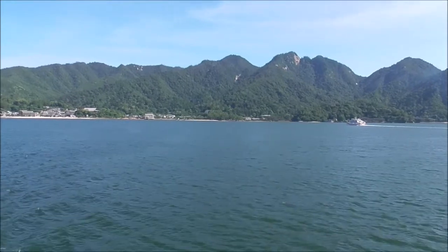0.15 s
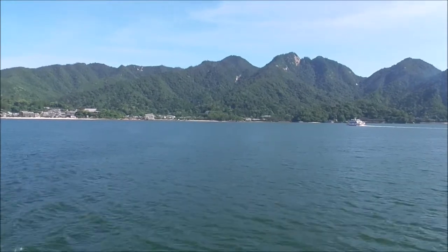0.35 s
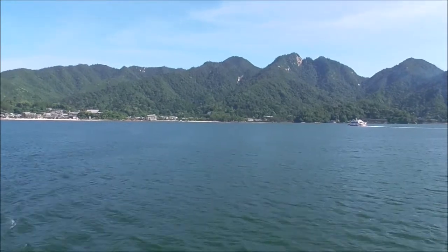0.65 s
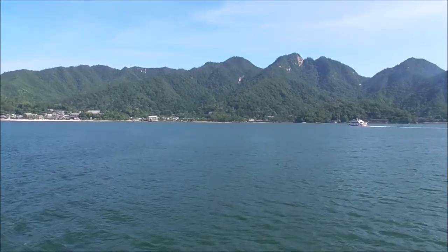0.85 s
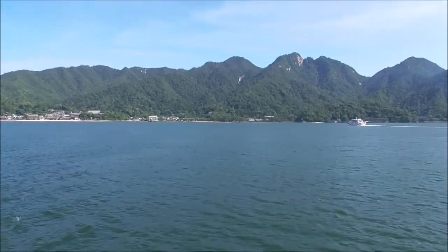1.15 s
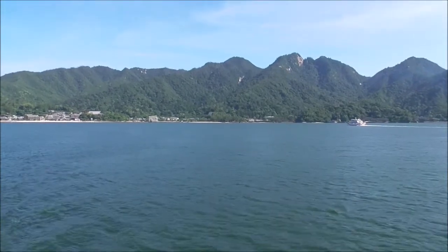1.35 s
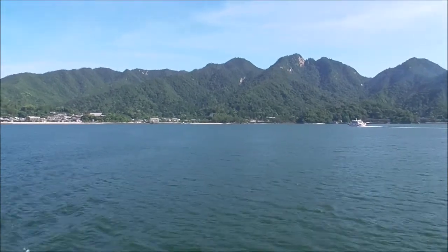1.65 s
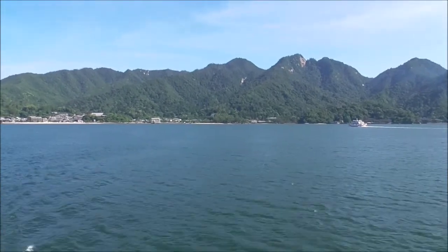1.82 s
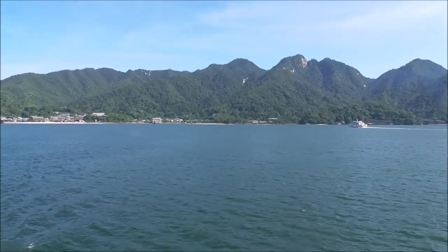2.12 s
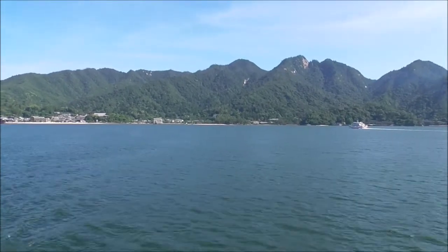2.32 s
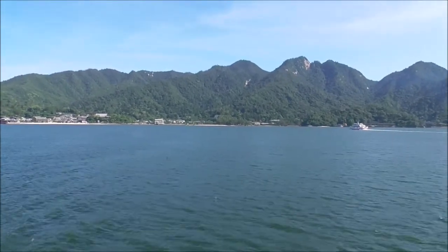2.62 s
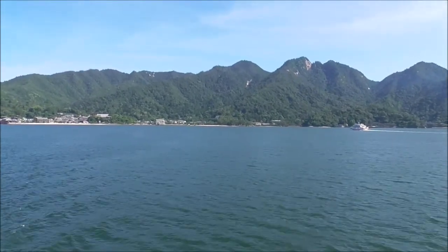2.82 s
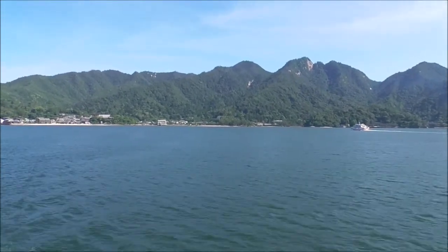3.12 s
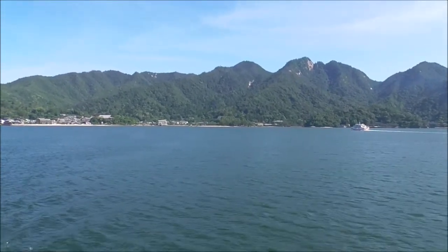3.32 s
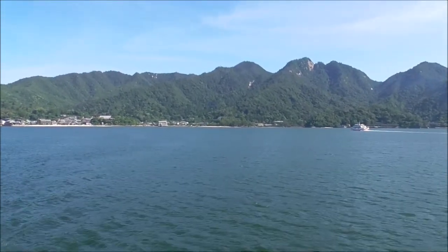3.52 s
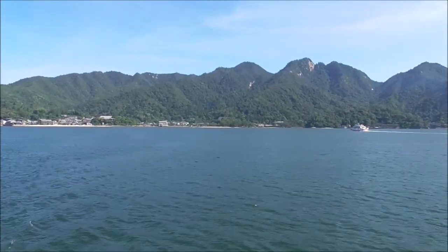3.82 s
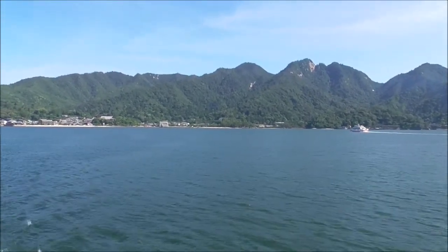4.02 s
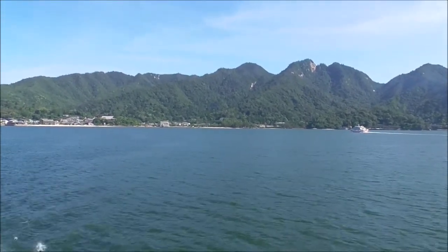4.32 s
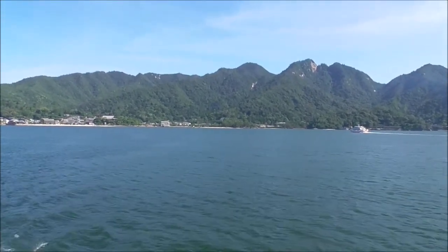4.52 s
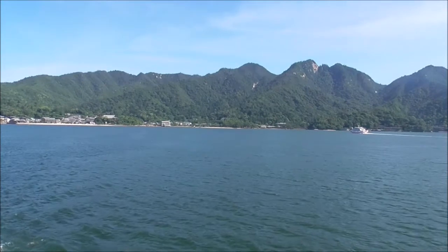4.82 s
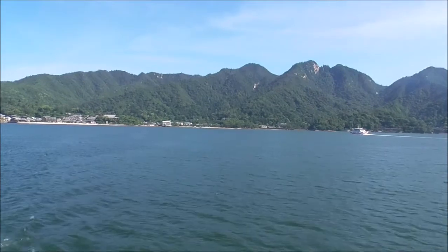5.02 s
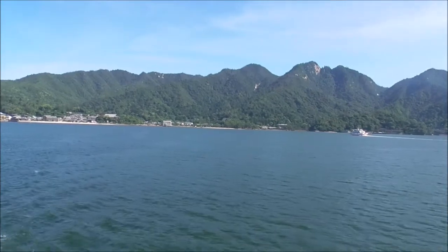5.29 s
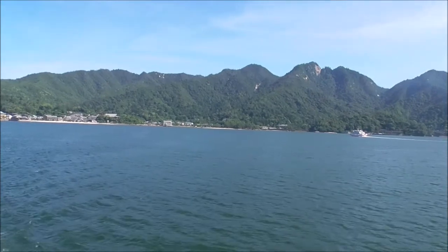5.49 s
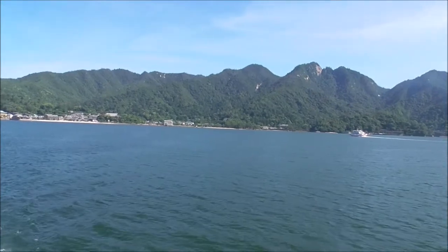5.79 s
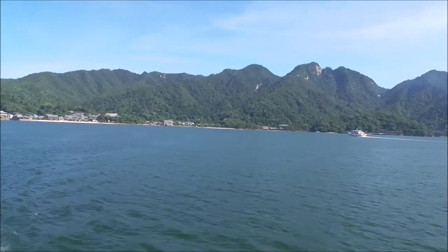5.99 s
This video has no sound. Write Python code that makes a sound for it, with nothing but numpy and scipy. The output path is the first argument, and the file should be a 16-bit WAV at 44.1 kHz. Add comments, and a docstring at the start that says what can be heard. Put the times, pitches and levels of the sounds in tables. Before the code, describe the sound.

Continuous wind noise dominates from start to finish, mostly low and muffled, flapping irregularly many times a second, heavier around three seconds and briefly gutted by lulls near four. Quiet foamy water hisses behind it and a deep engine drone stays central. Close, exposed stereo microphone outdoors on a boat, slightly rounded on the strongest gusts, with no echo.

```python
"""Wind shears over the two microphone ports on the open deck of a ferry under way: bands of noise flap and lull.
Close below, the wake is wavering high hiss; from farther down, three sine engine orders hum through the hull.
The stereo picture keeps opening towards the right and snapping back towards the centre.
The microphone rounds off the highest crests and a steep low-pass ends the treble."""
import sys
import numpy as np
from scipy import signal
from scipy.fft import rfft, irfft, next_fast_len
from scipy.io import wavfile
from scipy.ndimage import uniform_filter1d

SR = 44100
rng = np.random.default_rng(int(sys.argv[2]) if len(sys.argv) > 2 else 0)


def wav_record(signal):
    """Record a signal, one row per channel, as 16-bit PCM in the file named by sys.argv[1]."""
    frames = np.transpose(np.atleast_2d(signal))
    bounded = np.clip(frames, -1, 1)
    # unit amplitude maps onto the largest positive 16-bit level
    quanta = np.round(bounded * 32767).astype(np.int16)
    wavfile.write(sys.argv[1], SR, quanta)


N = 271215

# Slow swings of the wind before its flaps. Each row: time in seconds, level in dB,
# then deep rumble and upper roar in dB relative to that level.
WIND_SWINGS = [(0.0, -22, -9, 0), (0.5, -18.5, -0.5, -0.5), (1.2, -18.5, -5, 2), (1.75, -18.5, -2, 1.8),
               (2.5, -21.5, 2, 1.3), (3.0, -17.5, 4.5, -0.72), (3.3, -19, -0.5, -1), (3.55, -19, -1, -1.5),
               (3.8, -17, -5, -2), (4.2, -19, 5, -2.5), (4.45, -17.5, -1.5, 2.5), (4.75, -19.5, -3, 3),
               (5.0, -18.5, -5, -0.5), (5.4, -21, 3.5, 0.5), (6.15, -18.5, 0.5, -0.5)]
# Strongest eddies (plus) and lulls (minus) at the ports, before each band takes its share.
# Each row: centre in seconds, width at half height in seconds, roar in dB, puff in dB, edge in dB.
EDDIES = [(0.04, 0.02, -7, -5, -8), (0.122, 0.014, -2, -2, -3), (0.227, 0.023, -2, 9, 6),
          (0.273, 0.018, 5.5, 3, 9), (0.32, 0.033, 1.5, 8.5, 8), (0.394, 0.017, -6, -14, -10),
          (0.488, 0.041, 5, 1, 5.5), (0.56, 0.025, 1.5, 4, 3), (0.596, 0.022, 0.5, 2, 6),
          (0.741, 0.055, -4.0, -3, -0.5), (0.85, 0.032, -5, -5.0, -9), (0.899, 0.026, 2, 3.5, 1.0),
          (0.946, 0.026, 2.5, 1.5, 4), (1.02, 0.018, 1, 3, 3), (1.051, 0.03, -0.5, -9, -4.0),
          (1.099, 0.031, -0.5, -12, -5.5), (1.14, 0.024, 0, 1, 4), (1.164, 0.058, 3.5, 5, 2),
          (1.226, 0.059, -7.0, -7, -4), (1.268, 0.028, 5, 0.5, 5), (1.327, 0.049, 0.0, 4.5, -0.5),
          (1.395, 0.017, 2, 0, 3.5), (1.597, 0.016, 6, 11.5, 7.5), (1.626, 0.04, 3.5, -7, -5.5),
          (1.68, 0.016, 5, -1, -5.0), (1.709, 0.035, -4.0, -5, -1.5), (1.819, 0.061, 2, 1, 4.0),
          (2.011, 0.029, 4, 2.5, 4), (2.039, 0.026, 2, -5.0, -2), (2.137, 0.035, -4.5, -4.5, -3),
          (2.193, 0.021, 5.5, 0, 4.0), (2.22, 0.015, -4, 1, 6), (2.261, 0.018, 3.5, 3, 4),
          (2.373, 0.018, -11, -8, -10), (2.414, 0.025, 0.5, 4, 4), (2.449, 0.025, -2.5, -3, -2),
          (2.52, 0.021, -6, 5, 2), (2.553, 0.03, -3, -11, -7), (2.68, 0.021, 3.5, -2, 7.5),
          (2.716, 0.035, -2, -7, -2.5), (2.825, 0.038, -2, 3.5, 6), (2.888, 0.025, 1.5, -10, -1.5),
          (2.923, 0.027, 0.5, 0.5, 5.5), (2.952, 0.022, -5, -1, -3), (3.078, 0.024, 2, 6, 0.0),
          (3.118, 0.013, -2, 1, 4), (3.147, 0.012, 0, -5, 5), (3.238, 0.018, 3, -1, -4),
          (3.281, 0.016, 2, 0, 3), (3.309, 0.082, 4.5, 5, 3.5), (3.337, 0.032, -9, -4, -5),
          (3.386, 0.02, 3, 5.5, 6), (3.466, 0.02, 1, 5, 5), (3.584, 0.026, 5.5, 2.0, 1.5),
          (3.611, 0.016, 1, 2, 0.0), (3.694, 0.038, -4.5, -3.0, -5.0), (3.847, 0.026, -5, -6.5, -2.5),
          (3.887, 0.034, 2, 1.5, 3.5), (3.927, 0.0098, 4.5, 3, 7), (3.977, 0.026, -14, -8, -6),
          (4.093, 0.012, -5, -7, -10), (4.17, 0.032, -11, -11, -11), (4.245, 0.014, -13, -6, 2),
          (4.304, 0.02, 3.5, -1, 10), (4.34, 0.022, -3, 0, -1), (4.374, 0.018, -2, -2, 8),
          (4.396, 0.023, 0.5, 1, 2), (4.51, 0.03, -1, -5, -3), (4.595, 0.02, 0.5, 0, 6),
          (4.686, 0.055, -5, -7, -1), (4.727, 0.021, 0, 2, 3.5), (4.901, 0.015, -3, 1, 1),
          (4.968, 0.024, -2, -3.5, -4), (5.024, 0.029, -5.5, -5.0, -1), (5.169, 0.058, 6.5, 0.5, 4),
          (5.196, 0.017, -7, -9, -5), (5.255, 0.045, -6, -3, 0), (5.278, 0.022, -4, 3, 4),
          (5.336, 0.016, 6.5, 1.5, 3), (5.364, 0.032, -0.5, 7, 6.5), (5.413, 0.02, -1, 5, 3),
          (5.492, 0.034, 5.5, 4.5, 5), (5.612, 0.045, -1.5, -6.5, -3), (5.657, 0.038, 5.5, 1.5, 5.0),
          (5.687, 0.02, -9, -4, -1.5), (5.731, 0.043, 3, 6, 7.5), (5.763, 0.015, -12, -9, -7.0),
          (5.803, 0.016, -8.5, -10, -5.0), (5.899, 0.024, 1.5, -6.0, -3), (5.985, 0.045, 3.0, 4, 4.5),
          (6.034, 0.026, -1, 3, 4), (6.096, 0.035, 0.5, 6, 5.5)]
# Relative colour of the wind noise. Each row: frequency in Hz, density in dB per Hz.
WIND_COLOUR = [(20, -33), (53, -19.5), (66, -14.5), (110, -7), (200, -0.5), (280, 1), (540, -9),
               (1020, -24), (1370, -28), (1750, -38.5), (2100, -36), (2900, -41.5), (4600, -43.5),
               (6000, -52.5), (12000, -64)]
# How each wind band flaps. Each row: frequency in Hz, share of the roar flaps, share of the puff flaps,
# share of the edge flaps, rms of its own flicker in dB.
BAND_FLAPS = [(60, 0.69, 0.088, 0.33, 1), (131, .55, 0, 0.19, 2.5), (255, 0.92, 0, 0.14, 0.43),
              (420, 0.58, 0.2, 0.061, 0.95), (700, 0.14, 0.92, 0, 0.55), (1250, .02, 0.36, 0.16, 0.7),
              (2100, 0.041, 0, 0.78, 1.06), (3950, 0, 0, 0.97, 0.7), (6500, 0.05, 0, 0.52, 1.5)]
# How the two ports differ. Each row: frequency in Hz, gain of the shared wind leaning right,
# level in dB of the unrelated wind, power of the width that opens it; width scales both gains.
PORT_DIFFERENCE = [(60, 0.14, 2.5, 1), (250, 0.75, -5.5, 1), (700, 0.83, -11, 0.79),
                   (1500, 0.57, -8.5, 0.34), (3000, 0.56, -4, 0.5), (6000, 0.2, -6, .45)]
# Centres of deep rumble, main roar, upper roar and hissing edge, in Hz.
WIND_PARTS_HZ = 90, 280, 650, 2800
# Relative colour of the wake. Each row: frequency in Hz, density in dB per Hz.
WAKE_COLOUR = [(1000, 0.5), (2500, -7.5), (4500, -4), (5400, -3.5), (6200, -3.5), (6900, -0.5), (7600, 0.5),
               (10300, -1), (12100, -6), (14000, -15), (15100, -22), (15300, -29), (15600, -33)]
# Swells of the wake before its waver. Each row: time in seconds, level in dB.
WAKE_SWELLS = [(0.0, -48), (.14, -47.5), (.21, -45), (.5, -47.5), (.66, -50.5), (.8, -47.5), (1.02, -48.5),
               (1.1, -45.5), (1.2, -48.5), (1.55, -48.5), (1.68, -49), (2.0, -47), (2.2, -46.5),
               (2.35, -48.5), (2.64, -44), (2.72, -45), (2.83, -42), (2.92, -46), (3.3, -47), (3.5, -46.5),
               (3.62, -47), (3.69, -49.5), (3.8, -44.5), (3.98, -49), (4.03, -46.5), (4.38, -44.5),
               (4.57, -49), (4.71, -47), (4.95, -48.5), (5.05, -46), (5.14, -49), (5.27, -45.5),
               (5.52, -46.5), (5.64, -44.5), (5.77, -49), (5.92, -45), (6.15, -46)]
# Engine orders before drift and sway. Each row: frequency in Hz, level in dB rms.
ENGINE_ORDERS = [(63.9, -45), (95.7, -39), (127.6, -46)]
# Moments when the picture snaps inwards, before smoothing. Each row: time in seconds, width it restarts at in dB.
PICTURE_SNAPS = [(0.0, -54), (1.11, -11), (1.5, -10.5), (1.68, -13), (1.86, -50), (2.89, -15), (3.08, -54),
                 (3.14, -58), (3.2, -55), (3.26, -40), (3.5, -29), (3.61, -39), (4.28, -20.5), (5.44, -15),
                 (5.92, -15.5), (6.05, -18)]

# the hissing edge keeps this share of the wind's slow swings, around this level in dB
EDGE_SHARE, EDGE_DB = 0.13, -19.5
ROAR_LATE_S = .004  # the roar follows its edge
# rasp on the falling flanks of the roar: bands above this in Hz, depth in dB rms
RASP_HZ, RASP_DB = 750, .42
LEAN_S = .000055  # how far crests lean over, in seconds per unit of pressure
OPENS_PER_S, SNAP_S = 0.35, 0.042  # growth of the width per second; seconds a snap takes
SOFT_TOP = 0.87  # pressure at which the microphone rounds off crests
TOP_HZ = 15560  # end of the treble


def undb(db):
    """Turn dB into an amplitude ratio."""
    return 10 ** (np.asarray(db) / 20)


def unit(x):
    """Scale a signal to an rms of 1."""
    return x / np.sqrt(np.mean(x ** 2))


def on_log(table, hz, column=1):
    """Read a table at hz on a log-frequency axis."""
    rows = np.array(table, float)
    return np.interp(np.log(hz), np.log(rows[:, 0]), rows[:, column])


def in_time(table):
    """Columns of a curve, one value a sample."""
    s, *columns = np.transpose(table)
    t = np.arange(N) / SR
    return [np.interp(t, s, column) for column in columns]


def walk(rate):
    """Random levels held 1 / rate seconds and slewed twice; rms 1."""
    hold = int(SR / rate)
    steps = np.repeat(rng.standard_normal(N // hold + 1), hold)
    slewed = uniform_filter1d(uniform_filter1d(steps, hold), hold)
    return unit(slewed[:N])


def bands(colour):
    """Coloured noise in overlapping bands half an octave apart: yields (centre Hz, shared noise, unrelated noise)."""
    size = next_fast_len(N)
    hz = np.maximum(np.arange(size // 2 + 1) * SR / size, 1.)  # no log of zero
    spectra = rfft(rng.standard_normal((2, size))) * undb(on_log(colour, hz))
    # all shared bands together have an rms of 1
    spectra = spectra / np.sqrt(2 * np.sum(np.abs(spectra[0]) ** 2)) * size
    lowest_octave = np.floor(np.log2(colour[0][0]))
    for centre in 2. ** np.arange(lowest_octave, 14.5, .5):
        mask = np.cos(np.pi / 2 * np.clip(2 * np.log2(hz / centre), -1, 1)) ** 2
        shared, unrelated = irfft(spectra * mask, size)[:, :N]
        yield centre, shared, unrelated


def wind(level_db, rumble_db, upper_db, edge_db, width):
    """Turbulence at the ports: neighbouring bands flap together, each also flickers alone; crests fall steeply."""
    mid, side, falling = 0, 0, None
    roar, puff, edge = flaps()
    for hz, shared, unrelated in bands(WIND_COLOUR):
        roar_share, puff_share, edge_share, flicker_db = (on_log(BAND_FLAPS, hz, column=c) for c in range(1, 5))
        lean, apart_db, power = (on_log(PORT_DIFFERENCE, hz, column=c) for c in range(1, 4))

        # a band between two parts takes some of the slow level of each
        low, _, upper, top = (np.interp(np.log(hz), np.log(WIND_PARTS_HZ), row) for row in np.eye(4))
        slow_db = low * rumble_db + upper * upper_db + top * edge_db
        flap_db = roar_share * roar + puff_share * puff + edge_share * edge
        gain = undb(slow_db + flap_db + flicker_db * walk(40))

        if hz > RASP_HZ:
            if falling is None:  # slope of the bands below, positive while the pressure falls
                falling = -unit(np.gradient(mid))
            gain = gain * undb(RASP_DB * falling)

        mid = mid + gain * shared
        apart = undb(apart_db) * width ** power * unrelated
        side = side + gain * (apart - lean * width * shared)
    ports = undb(level_db) * np.array([mid + side, mid - side])  # left, right
    return ports * (1 - LEAN_S * SR * np.gradient(ports, axis=1))


def flaps():
    """Swings in dB of roar, puffs above it and hissing edge: listed eddies and lulls over random flutter."""
    roar, puff, edge = np.zeros((3, N))
    for s, width_s, roar_db, puff_db, edge_db in EDDIES:
        bump = np.hanning(int(2 * width_s * SR))
        for swing, db, late_s in (roar, roar_db, ROAR_LATE_S), (puff, puff_db, 0), (edge, edge_db, 0):
            start = max(int((s + late_s - width_s) * SR), 0)
            swing[start:start + len(bump)] += db * bump[:N - start]

    flutter = walk(24.9)  # common to all three
    roar = roar + 0.45 * flutter + .6 * walk(26)
    puff = puff + 0.51 * flutter + .5 * walk(60) + 1.45 * walk(170)
    edge = edge + 0.18 * flutter + 0.79 * walk(80) + 1.95 * walk(300)
    return roar, puff, edge


def wake(hiss_db, width):
    """Foam along the hull: hiss that wavers a little; it widens with the picture, the top most."""
    mid, apart = 0, 0
    waver_db = 0.54 * walk(45)
    for hz, shared, unrelated in bands(WAKE_COLOUR):
        gain = undb(waver_db + 0.76 * walk(35))
        mid = mid + gain * shared
        apart = apart + gain * (hz / 8000) ** 0.15 * unrelated
    side = undb(-3.5) * width ** 0.46 * apart - .1 * width * mid  # the last term leans right
    return undb(hiss_db) * np.array([mid + side, mid - side])


def engine():
    """Firing orders as sines that drift together slightly in pitch; each sways in level on its own."""
    drift = 1 + 0.0025 * walk(2.31)
    phase_per_hz = 2 * np.pi * np.cumsum(drift) / SR
    hum = 0
    for hz, db in ENGINE_ORDERS:
        sway_db = 1.8 * walk(4.9)
        hum = hum + np.sqrt(2) * undb(db + sway_db) * np.sin(hz * phase_per_hz)
    return hum


def picture():
    """Stereo width as an amplitude ratio: opens at an even pace after each snap."""
    t = np.arange(N) / SR
    s, db = np.transpose(PICTURE_SNAPS)
    last = np.maximum(np.searchsorted(s, t, side="right") - 1, 0)
    width = undb(db[last]) + OPENS_PER_S * np.maximum(t - s[last], 0)
    return uniform_filter1d(width, int(SNAP_S * SR))


def scene():
    """Wind at the ports, wake below and engine hum in the centre."""
    level_db, rumble_db, upper_db = in_time(WIND_SWINGS)
    edge_db = (1 - EDGE_SHARE) * (EDGE_DB - level_db)  # relative to the wind level
    hiss_db, = in_time(WAKE_SWELLS)
    width = picture()
    return wind(level_db, rumble_db, upper_db, edge_db, width) + wake(hiss_db, width) + engine()


def record(dry):
    """The microphone rounds the highest crests, then a steep low-pass cuts the top."""
    rounded = dry / (1 + (dry / SOFT_TOP) ** 4) ** .25
    top = signal.ellip(10, .2, 70, TOP_HZ, fs=SR, output="sos")
    # the filter starts settled on the first sample of each channel
    state = signal.sosfilt_zi(top)[:, None, :] * rounded[None, :, :1]
    return signal.sosfilt(top, rounded, zi=state)[0]


dry = scene()
out = record(dry)
wav_record(out)
```